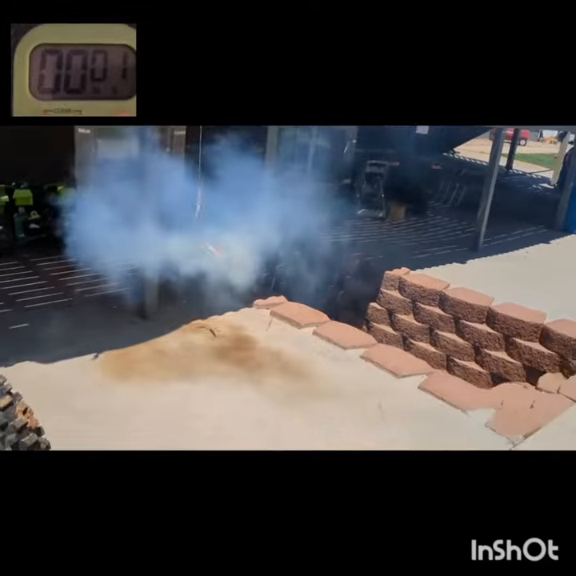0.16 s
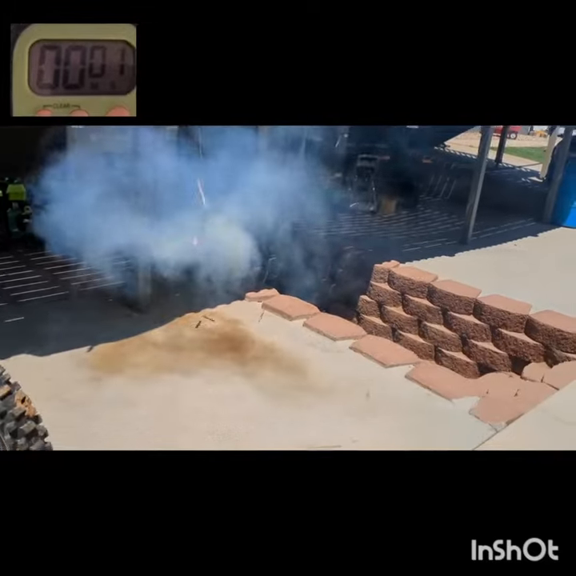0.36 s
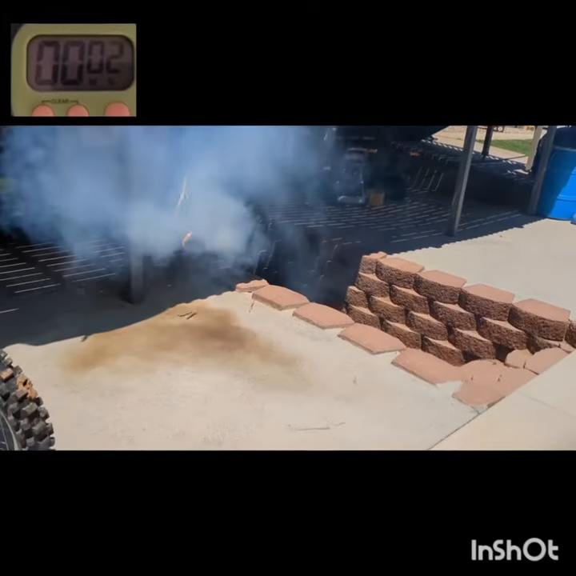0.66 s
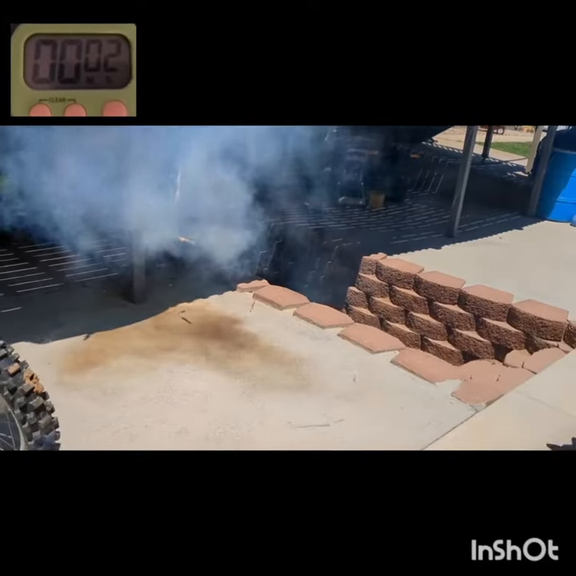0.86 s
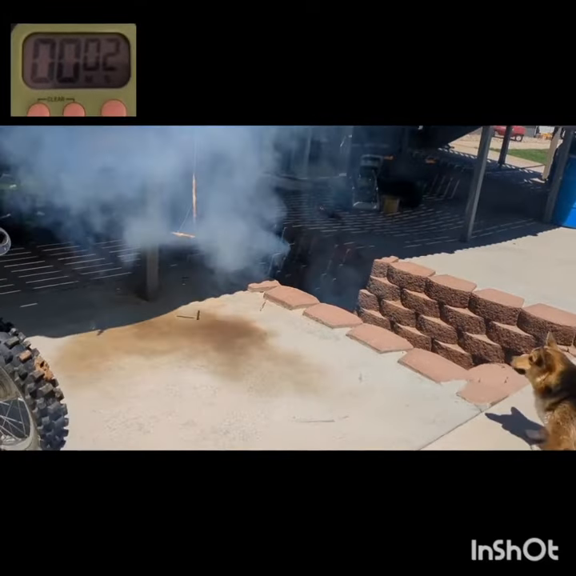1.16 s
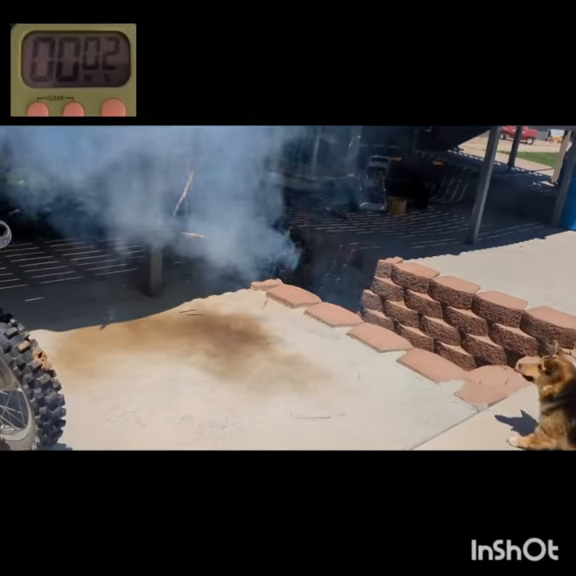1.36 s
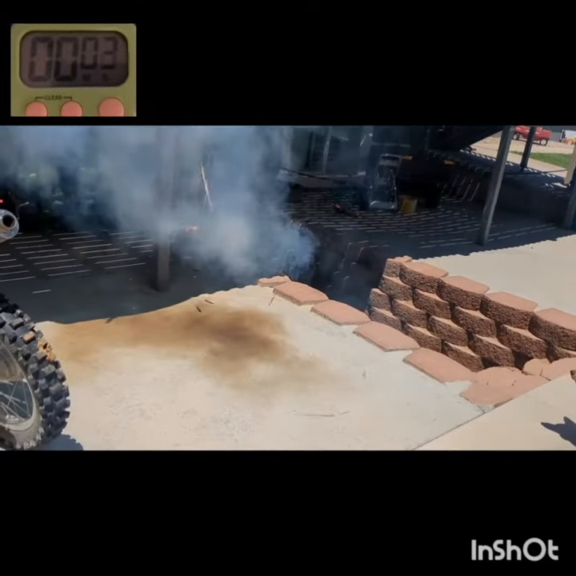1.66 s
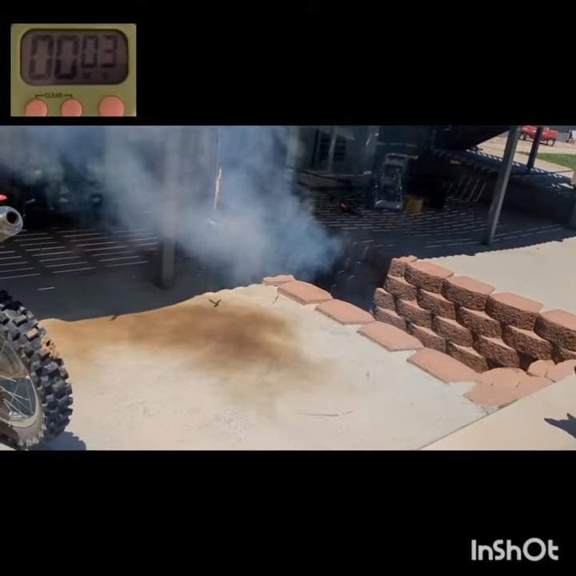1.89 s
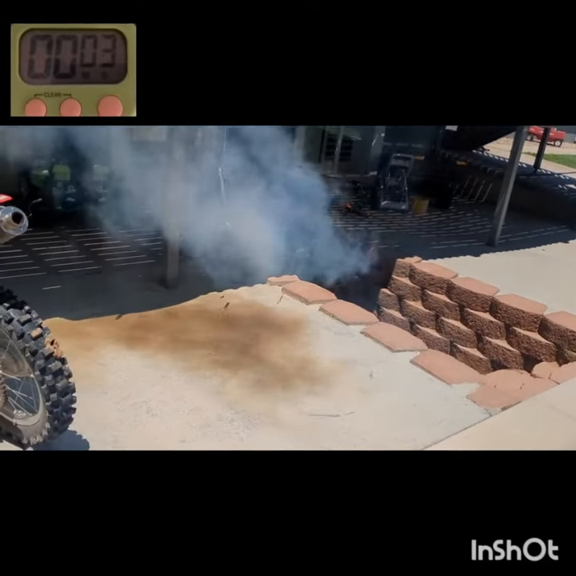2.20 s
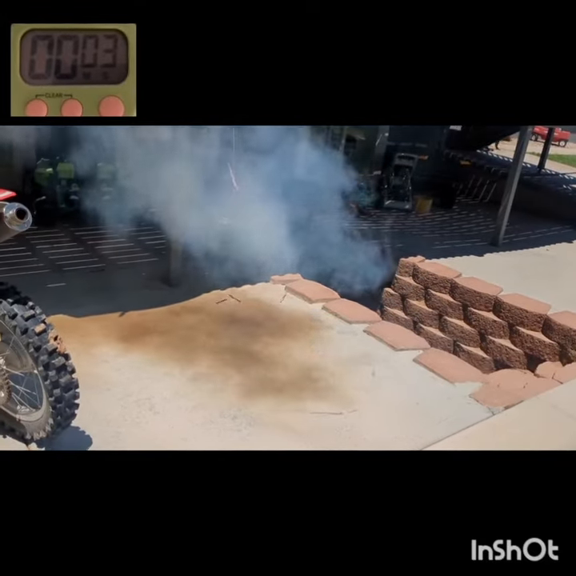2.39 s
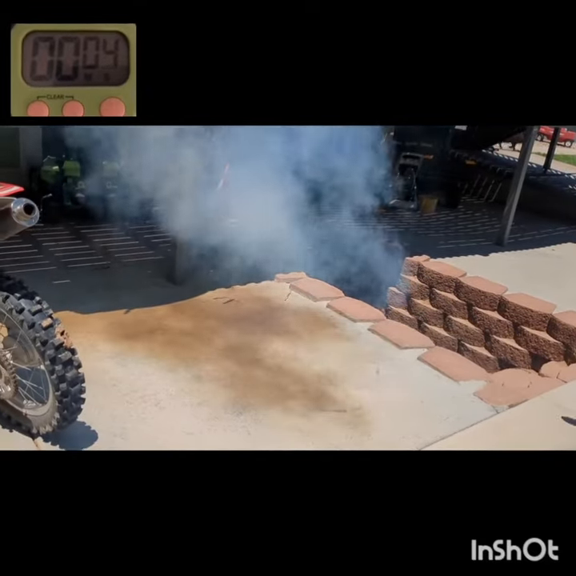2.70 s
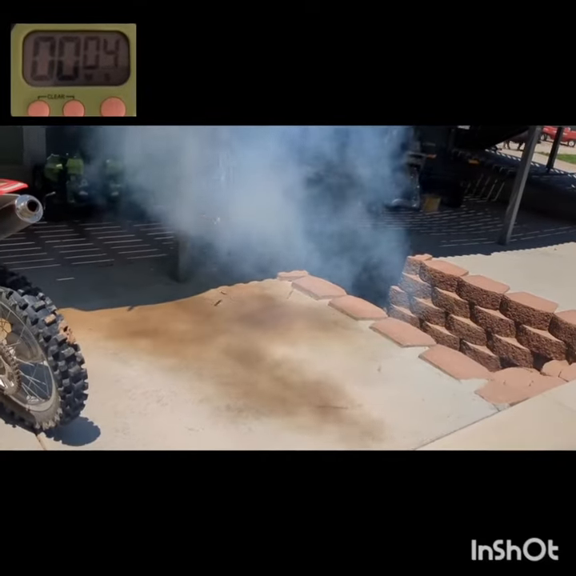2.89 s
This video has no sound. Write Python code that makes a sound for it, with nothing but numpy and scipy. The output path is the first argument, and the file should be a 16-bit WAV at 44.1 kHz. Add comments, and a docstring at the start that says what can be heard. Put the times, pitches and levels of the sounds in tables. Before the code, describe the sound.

Loud piercing firework whistle, already burning at the start, slides steadily down with brief stumbles and a fluttering edge; hissing gas and faint low rumble lie underneath. Outdoor yard, reflective walls, stereo camera microphone brighter on the left.

```python
"""A piercing whistle and a gassy hiss: a firework burns on a concrete yard beside a covered porch.
Its tube sings one note that sinks as the fuel burns down, wavers about ten times a second and breaks
into half-pitch overtones. The jet is shaped noise with a fine crackle; wall echoes make the note flutter.
A low rumble and faint hum lie beneath. The hiss falls where the camera's gain yields to the whistle,
and a quick limiter holds down the peaks."""
import sys
import numpy as np
from scipy import signal
from scipy.fft import rfft, irfft, next_fast_len
from scipy.io import wavfile
from scipy.ndimage import uniform_filter1d, minimum_filter1d, map_coordinates

SR = 44100
rng = np.random.default_rng(int(sys.argv[2]) if len(sys.argv) > 2 else 0)


def int16_out(signal):
    """Quantize to a 16-bit WAV file."""
    q = np.round(np.clip(np.atleast_2d(signal).T, -1, 1) * 32767)
    wavfile.write(sys.argv[1], SR, q.astype(np.int16))


N = 134505
SIDES = np.array([[1], [-1]])  # left, right


def amp(db):
    """Decibels to gain."""
    return 10 ** (np.asarray(db) / 20)


def unit(x):
    """Scaled to rms 1."""
    return x / np.sqrt(np.mean(x ** 2) + 1e-20)


def along(points, hz):
    """Values at hz from (Hz, value) points joined on a log frequency axis."""
    point_hz, values = np.transpose(points)
    return np.interp(np.log(hz + 1), np.log(point_hz + 1), values)


def curve(rows):
    """(seconds, value) points joined into one value per sample."""
    return np.interp(np.arange(N) / SR, *np.transpose(rows))


def wobble(rate):
    """A smooth random curve with rate knots a second."""
    knots = rng.standard_normal(N // 8)
    return map_coordinates(knots, [np.arange(N) * rate / SR], mode="wrap")


def filtered(x, response):
    """The sound x with its spectrum multiplied by a response of frequency."""
    size = next_fast_len(N + SR // 2)
    spectrum = rfft(x, size) * response(np.fft.rfftfreq(size, 1 / SR))
    return irfft(spectrum, size)[..., :N]


def turns(hz):
    """Running phase in radians of a frequency curve."""
    return 2 * np.pi * np.cumsum(hz) / SR


def partials(table, phase, slip):
    """Sines at multiples of one phase, each flickering in level on its own."""
    flicker_db = 3
    total = 0
    for multiple, db in table:
        level = amp(db + flicker_db * wobble(90))
        total = total + level * np.sin(multiple * phase + slip)
    return total


def whistle():
    """The tube's resonance sings a note with whole and half overtones, all on one unsteady pitch."""
    # Resonance of the burning tube. Each row: time in seconds, pitch in Hz.
    tube_pitch = [(0.0, 5745), (0.1, 5397), (0.21, 5209), (0.245, 5423), (0.3, 5217), (0.41, 5193),
                  (0.47, 5079), (0.62, 4958), (0.72, 4818), (0.92, 4600), (1.2, 4399), (1.45, 4164),
                  (1.62, 4075), (1.68, 4151), (2.0, 3890), (2.3, 3690), (2.5, 3608), (2.75, 3540),
                  (3.05, 3335)]
    # Depth of the waver. Each row: time in seconds, depth in Hz.
    waver_depth = [(0, 5), (.5, 37), (1.3, 40), (2.2, 30.3), (2.6, 19.8), (3.05, 13.3)]
    # The burn stumbles and the pitch dips. Each row: time in seconds, dip in Hz.
    sputters = [(0.564, 503), (0.659, 153), (0.83, 285), (1.584, 403), (1.619, 405)]
    # Overtones of the full pitch. Each row: multiple of the pitch, level in dB.
    whole_tones = [(2, -14), (3, -17), (4, -24)]
    # Overtones of half the pitch. Each row: multiple of the pitch, level in dB.
    half_tones = [(.5, -16), (1.5, -17), (2.5, -21), (3.5, -27), (4.5, -31)]
    # Strength of the whole overtones. Each row: time in seconds, level in dB.
    whole_strength = [(0, -7.5), (.3, -4), (.8, -4.5), (1.25, 4.5), (1.5, -2), (2.2, -4.5), (2.55, 2.5),
                      (2.7, -1.5), (3.05, 4)]
    # Half-pitch strength, as the burn alternates strong and weak. Each row: time in seconds, level in dB.
    half_strength = [(0, -58), (.25, -13.5), (.4, -12.5), (.57, -4), (.62, -28), (.675, -0.5), (.73, -27),
                     (.79, -5), (1.05, -2.5), (1.3, 0.5), (1.55, -3.5), (1.8, -10.5), (2.05, -5.5),
                     (2.25, -19.5), (2.36, -11), (2.8, -6), (3.05, -1.5)]
    # The note's highest partials are weak. Each row: frequency in Hz, gain in dB.
    note_top = [(11000, 0), (12500, -4), (13500, -11), (14500, -16), (15700, -16)]
    # Strength of the note. Each row: time in seconds, level in dB.
    effort = [(0, -9), (.15, -14), (.21, -8), (.25, -4), (.55, -1.5), (.7, 0), (.8, -2.5), (1.25, -6),
              (1.6, -6), (2.2, -4), (2.6, -4.5), (3.05, 0.5)]
    waver_per_s, speedup_per_s2, crest_s = 9.731, 1.22, 1.278  # rate at the crest, and its growth
    jitter_hz, fast_jitter_hz, shimmer_db = 10, 12, .5  # jitter once the note has settled
    start_rough, settle_s = 5, 0.079  # the note is rougher while it catches
    sputter_s, choke_db = .0016, -12
    slip_hz, lock_s = 94, .71  # the half tones drift in phase until they lock
    half_flicker_db = 2.0

    t = np.arange(N) / SR
    since_crest = t - crest_s
    waver_cycles = waver_per_s * since_crest + speedup_per_s2 * since_crest ** 2 / 2
    waver = curve(waver_depth) * np.cos(2 * np.pi * waver_cycles)
    rough = 1 + start_rough * np.exp(-t / settle_s)
    jitter = rough * (jitter_hz * wobble(120) + fast_jitter_hz * wobble(900))

    # Each stumble is a brief bell-shaped dip in pitch and level
    stumbles = np.array([np.exp(-((t - s) / sputter_s) ** 2) for s, _ in sputters])
    dips = np.array([hz for _, hz in sputters]) @ stumbles

    phase = turns(curve(tube_pitch) + waver + jitter - dips)
    slip = turns(slip_hz * wobble(700) * (t < lock_s))
    whole = amp(curve(whole_strength)) * partials(whole_tones, phase, 0)
    half_level = amp(curve(half_strength) + half_flicker_db * wobble(45))
    half = half_level * partials(half_tones, phase, slip)
    note = filtered(np.sin(phase) + whole + half, lambda hz: amp(along(note_top, hz)))
    level_db = curve(effort) + shimmer_db * wobble(300) + choke_db * stumbles.sum(0)
    return amp(level_db) * note


def jet():
    """Rushing gas is coloured noise, with a fine, bright crackle of sparks from random clicks."""
    # Colour of the hiss. Each row: frequency in Hz, relative gain in dB.
    hiss_colour = [(100, -11), (350, -13), (550, -1), (800, 6.5), (1050, -1.5), (1400, -4), (2000, 3.5),
                   (3500, 3), (5500, 1), (7500, -2.5), (11000, -0.5)]
    # Its treble roll-off. Each row: frequency in Hz, gain in dB.
    hiss_top = [(11000, 0), (13000, -1), (14300, -4), (15500, -3)]
    # Level of the hiss as heard, falling where the camera's gain yields to the whistle.
    # Each row: time in seconds, level in dB.
    hiss_level = [(0, -26), (.2, -26), (.25, -30), (.7, -24), (.8, -31), (1.2, -28.5), (1.6, -30.5),
                  (2.2, -31), (2.7, -28), (3.05, -21)]
    crackle_per_s, crackle_db, crackle_hz = 70, -9, 7000  # level against the raw noise; treble corner
    flicker_db = 1.1

    pops = (rng.random(N) < crackle_per_s / SR) * rng.standard_normal(N)
    sparks = unit(filtered(pops, lambda hz: hz / (hz + crackle_hz)))
    raw = rng.standard_normal(N) + amp(crackle_db) * sparks
    gas = filtered(raw, lambda hz: amp(along(hiss_colour, hz) + along(hiss_top, hz)))
    return unit(gas) * amp(curve(hiss_level) + flicker_db * wobble(70))


def yard():
    """Low outdoor rumble from filtered noise and a faint hum, nearly the same at both ports."""
    # Colour of the rumble. Each row: frequency in Hz, relative gain in dB.
    rumble_colour = [(20, -13), (60, -5.5), (130, 0.5), (250, 3), (500, -5), (1000, -4), (4000, -93)]
    # The hum's tones. Each row: frequency in Hz, level in dB.
    hum_tones = [(59.5, -63.5), (118.6, -57)]
    rumble_db = -51.5

    noise = rng.standard_normal((2, N))
    mid, side = filtered(noise, lambda hz: amp(along(rumble_colour, hz)))
    rumble = amp(rumble_db) * unit(mid + 0.083 * side * SIDES)
    hum = sum(amp(db) * np.sin(turns(hz + wobble(10))) for hz, db in hum_tones)
    return rumble + hum


def direct(x):
    """The straight path reaches the left port first."""
    port_lag_s = 19 / 44100
    # Half the lag as a lead on the left, half as a delay on the right
    return filtered(x, lambda hz: np.exp(1j * np.pi * hz * port_lag_s * SIDES))


def echoes(x, t60):
    """Dense reflections as decaying noise, different at each port, down 60 dB after t60 seconds."""
    t = np.arange(SR // 2) / SR
    tail = rng.standard_normal((2, len(t))) * 10 ** (-3 * t / t60)
    tail = tail / np.linalg.norm(tail[0])
    return signal.fftconvolve(x[None], tail, axes=1)[:, :N]


def far_walls(x):
    """Late echoes still carry the earlier, higher pitch and beat against the note."""
    # Walls across the yard. Each row: delay in seconds, level in dB against the near walls.
    bounces = [(.052, -4), (.078, -9)]
    spread_s = .02  # decay time of each echo
    total = 0
    for delay_s, db in bounces:
        late = np.pad(echoes(x, spread_s), ((0, 0), (int(delay_s * SR), 0)))[:, :N]
        total = total + amp(db) * late
    return total


def scene():
    """Note and hiss arrive directly and off the walls, over the yard's background."""
    # Wall reflections of the note, as the camera backs away. Each row: time in seconds, level in dB.
    wall_strength = [(0, -3), (.6, -4.5), (.85, -5), (1.35, -1), (1.8, 0), (3.05, 1.5)]
    # Balance of the note. Each row: time in seconds, left minus right in dB.
    whistle_pan = [(0, 0), (.25, 4.5), (.35, -4), (.65, 1), (.78, 0), (1.0, 2), (1.28, -2.5), (1.42, -0.5),
                   (1.6, 3.5), (1.85, 4), (2.2, 2.5), (2.35, -2.5), (2.7, -2.5), (3.05, -0.5)]
    walls_t60_s, porch_t60_s = 0.084, .5
    porch_db, hiss_wet_db = -15.5, -5
    hiss_pan_db = 2  # left minus right

    note, hiss = whistle(), jet()
    walls = amp(curve(wall_strength)) * (echoes(note, walls_t60_s) + far_walls(note))
    porch = amp(porch_db) * echoes(note, porch_t60_s)
    note = direct(note) + walls + porch
    hiss = direct(hiss) + amp(hiss_wet_db) * echoes(hiss, walls_t60_s)
    note = note * amp(curve(whistle_pan) * SIDES / 2)
    hiss = hiss * amp(hiss_pan_db * SIDES / 2)
    return note + hiss + yard()


def record(dry):
    """The camera mirrors tones near its band split, has one dull microphone, and quickly limits the level."""
    # Response of the dull right microphone. Each row: frequency in Hz, gain in dB.
    right_mic = [(200, 0.5), (1000, 4), (6000, -2.5), (6800, -10), (7300, -17), (9000, -24), (12000, -26.5),
                 (15700, -32)]
    mirror_hz, mirror_width_hz, mirror_db = 8010, 1020, -5
    ceiling, hold_s, ease_s = .97, .035, .006  # limiter: full-scale peak, hold and smoothing times
    top_hz = 15750

    # Shifting down by twice the split turns each tone into its mirror image about the split
    near = filtered(dry, lambda hz: np.exp(-((hz - mirror_hz) / mirror_width_hz) ** 2))
    shift = np.exp(-4j * np.pi * mirror_hz * np.arange(N) / SR)
    mirror = np.real(signal.hilbert(near) * shift)
    heard = dry + amp(mirror_db) * mirror
    x = filtered(heard, lambda hz: amp([np.zeros_like(hz), along(right_mic, hz)]))

    # One gain for both sides drops just ahead of a peak and is held after it
    needed = np.minimum(1, ceiling / (np.abs(x).max(0) + 1e-9))
    hold, ease = int(hold_s * SR), int(ease_s * SR)
    held = minimum_filter1d(needed, hold, origin=(hold - ease) // 2)
    gain = uniform_filter1d(held, ease)
    return filtered(x * gain, lambda hz: hz < top_hz)


dry = scene()
out = record(dry)
int16_out(out)
```